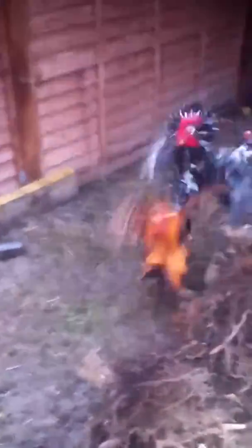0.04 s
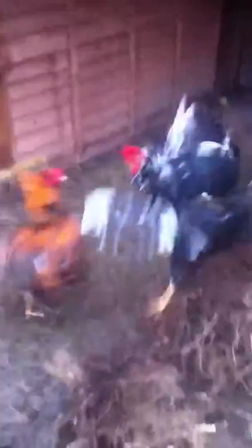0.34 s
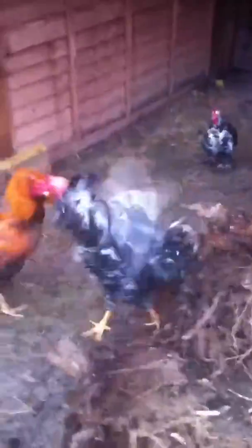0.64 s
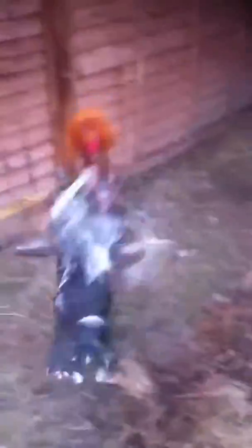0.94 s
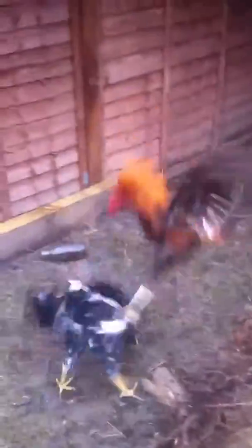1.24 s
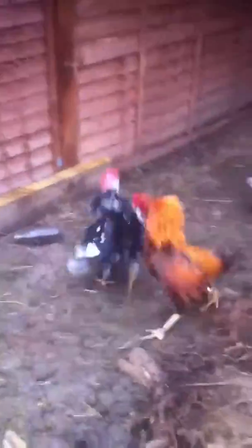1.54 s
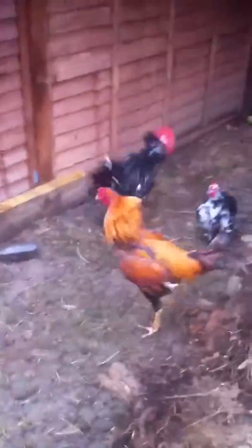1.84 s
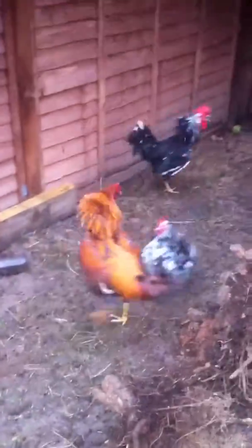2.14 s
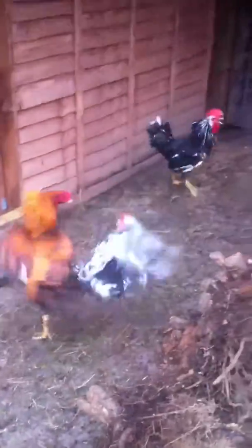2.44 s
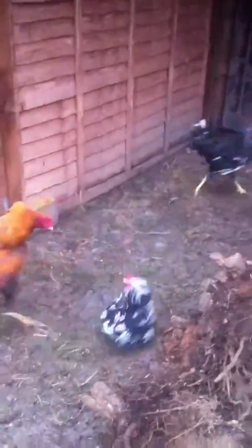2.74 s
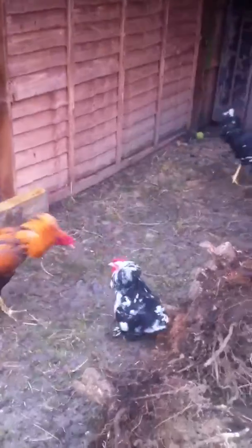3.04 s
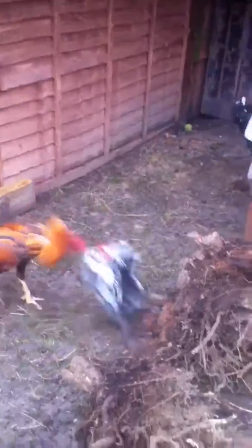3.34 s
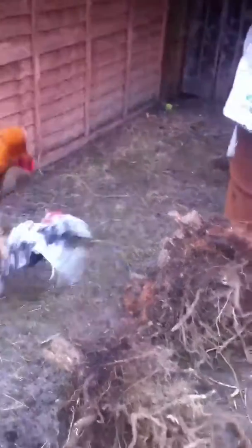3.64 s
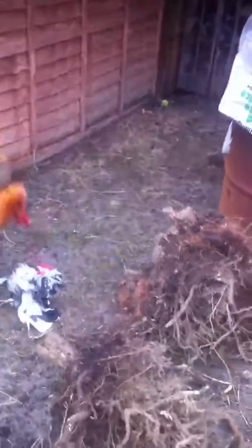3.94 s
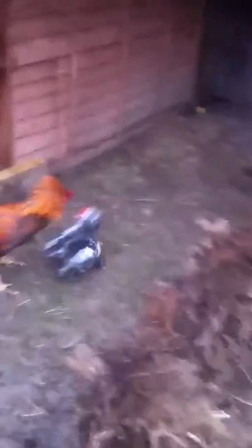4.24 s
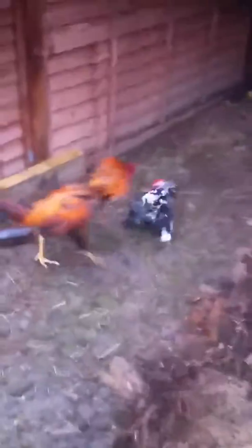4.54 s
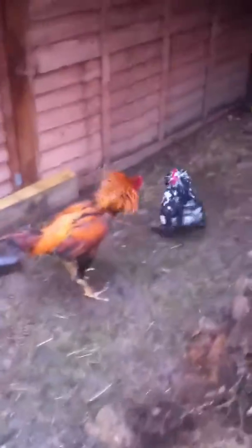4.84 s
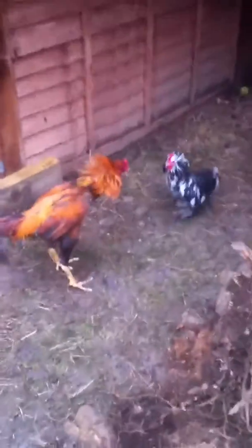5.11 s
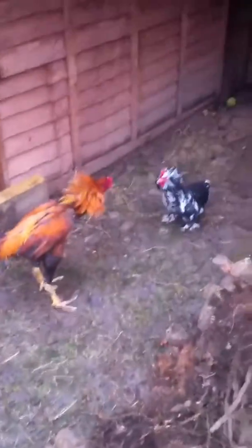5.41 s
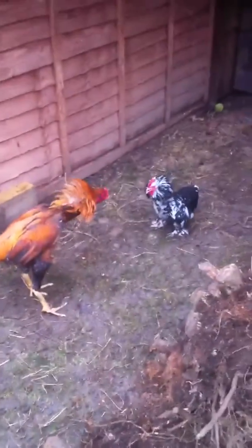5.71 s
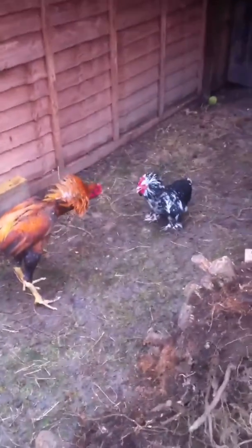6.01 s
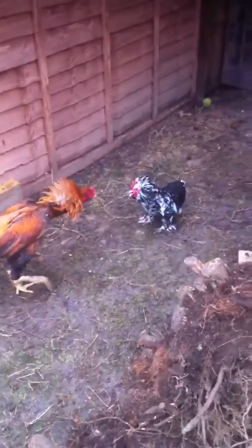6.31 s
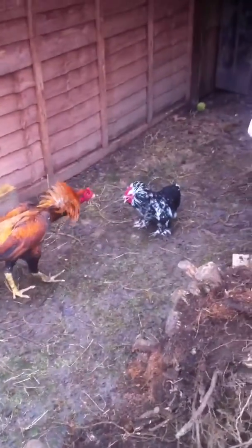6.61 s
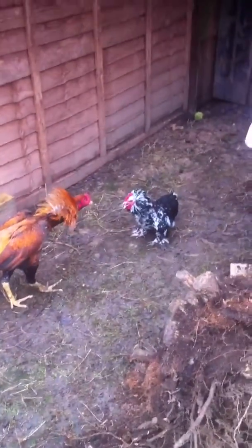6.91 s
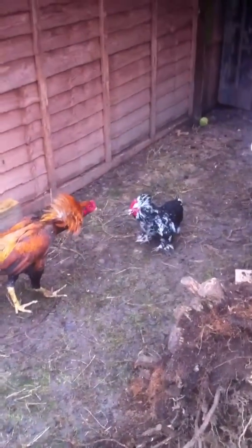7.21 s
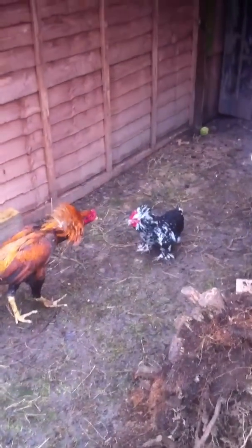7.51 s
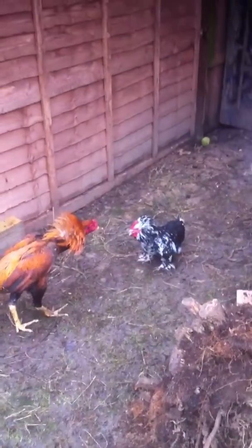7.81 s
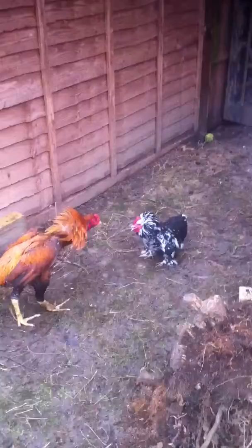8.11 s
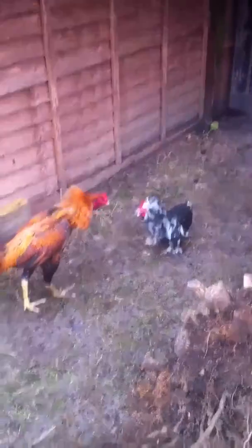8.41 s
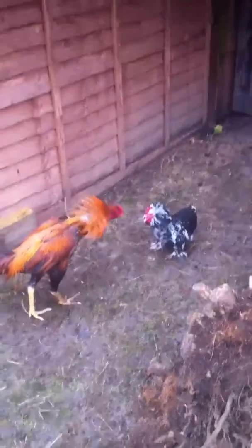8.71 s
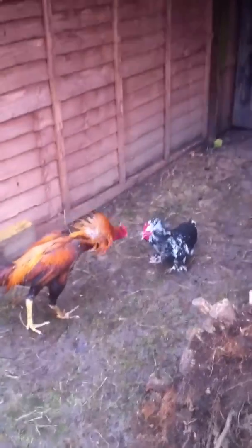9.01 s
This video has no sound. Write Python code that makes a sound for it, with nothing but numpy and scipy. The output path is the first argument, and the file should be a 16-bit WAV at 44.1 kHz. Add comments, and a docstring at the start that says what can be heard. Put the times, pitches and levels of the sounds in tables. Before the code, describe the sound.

Two roosters spar with bursts of clapping wings and rustling feathers, then settle into soft clucks, pips and a thin whine.

```python
"""Two roosters spar on bare earth beside a wooden fence. First come two light wing claps, pops of trapped
air, then clucks and falling pips. After one second the main clash claps and thumps, and a bird leaves on
slowing, whistling wingbeats. Lighter flurries and rustles follow. From five seconds on, in the stand-off,
a wing is shaken, syrinx pulses ring the throat in clucks, and pips rise among soft hums; last, one bird
whines thinly. Throughout, ground, fence and walls reflect the sound over a quiet outdoor rumble."""
import sys
import numpy as np
from scipy import signal
from scipy.fft import rfft, irfft
from scipy.io import wavfile

SR = 44100
rng = np.random.default_rng(int(sys.argv[2]) if len(sys.argv) > 2 else 0)


def dump(signal):
    """Clip the signal to [-1, 1] and save it as 16-bit WAV at the path in sys.argv[1]."""
    limited = np.clip(np.atleast_2d(signal).T, -1, 1)
    pcm = np.round(limited * 32767).astype(np.int16)
    wavfile.write(sys.argv[1], SR, pcm)


N = 403515
TIME = np.arange(N) / SR

# Wings meeting. Each row: start in seconds, pop level in dB, pop pitch in Hz, relative crack gain in dB,
# feather level in dB, feather tilt in dB per octave, level of the displaced air in dB.
WING_CLAPS = [(.105, -49, 870, 9, -39, 1, -47), (.177, -37, 686, 3, -34, -0.5, -48),
              (1.0538, -23, 316, -8.5, -31, -2.5, -27), (1.1602, -19.5, 564, 2.5, -30.5, -.7, -43),
              (1.2392, -25, 1054, 8, -30, -3.5, -48), (1.3289, -31.5, 860, 8.5, -30, -1.5, -36),
              (2.457, -48.5, 873, 0.5, -52, 4, -66), (3.61, -63, 700, 10, -49, -1.5, -51)]
# Soft low thumps: wing downstrokes and one muffled, cluck-like sound (0.314 s).
# Each row: peak time in seconds, thump level in dB, frequency factor, rustle level in dB.
LOW_THUMPS = [(.146, -42.5, 0.94, -41), (.314, -50.5, 1.36, -64), (1.101, -34, 0.96, -33.5),
              (1.48, -55, 0.89, -67), (3.585, -43, 1.37, -51), (3.987, -57, .85, -78)]
# Brushes, scuffs and one soft, breathy cluck (0.609 s).
# Each row: peak time in seconds, level in dB, fall in seconds, tilt in dB per octave.
SOFT_BURSTS = [(.033, -56, 0.016, -3), (0.063, -45, 0.0068, -3.5), (.088, -45, 0.022, -3),
               (.12, -47.5, 0.042, -3), (.184, -36, 0.019, -1.2), (.25, -53, 0.019, -0.5),
               (.301, -49.5, 0.01, -5), (.40, -54, 0.02, -1.5), (.609, -53, 0.014, -7),
               (1.05, -46, 0.09, -2), (1.385, -50, .03, -1), (1.448, -44.5, 0.014, -1),
               (2.465, -55.5, 0.064, -1), (2.50, -49.5, 0.0069, -3), (2.602, -52.5, 0.0068, 0),
               (3.54, -50.5, 0.041, -1.5), (3.735, -55, 0.022, -1.5), (3.926, -58.5, 0.034, 0.5),
               (4.165, -56.5, 0.02, 1), (4.233, -54, 0.032, 0), (4.475, -56, 0.016, 0.5),
               (5.414, -57.5, 0.054, -4.5), (8.284, -62, .006, -3), (8.59, -69, 0.069, 1)]
# Activity of feet and plumage, ending at rest. Each row: time in seconds, bustle in dB before scaling.
BUSTLE = [(0.0, -60.5), (0.59, -66.5), (0.81, -62.5), (1.04, -66), (1.2, -60), (1.3, -59.5), (1.55, -65),
          (1.78, -68), (2.24, -71.5), (2.6, -67), (3.16, -71.5), (3.49, -72.5), (3.69, -66.5),
          (4.43, -68.5), (4.69, -73.5), (9.15, -74.5)]
# Low clucks. Each row: peak time in seconds, level in dB, fall in seconds, pitch in Hz,
# factor on the throat's resonance frequencies, upper band edge in Hz.
LOW_CLUCKS = [(.500, -45, 0.0057, 249, 0.83, 1090), (1.497, -41.5, 0.011, 235, 1.25, 2000),
              (1.743, -47, 0.011, 296, 1.09, 1590), (2.1014, -31.5, .017, 239.6, 0.987, 3650),
              (2.274, -47, .004, 290, 1.04, 890), (5.125, -60, .007, 261, 1.2, 1800),
              (5.348, -50, .005, 293, 1.23, 2200), (6.115, -61, .009, 275, 1.2, 2980),
              (6.256, -49.5, 0.011, 269, 1.05, 755), (6.573, -60.5, .006, 285.5, 1.55, 3000),
              (6.778, -47.5, .016, 306, 1.04, 2300), (6.953, -45, 0.012, 296, 1.14, 2080),
              (7.305, -57, 0.0095, 302, 0.94, 980)]
# High pips. Each row: peak time in seconds, level in dB, pitch in Hz, glide in octaves per second,
# relative level of the octave in dB.
HIGH_PIPS = [(.575, -49, 1074, -11.5, -22), (.717, -43, 1118, -11.5, -20), (.880, -41, 1073, -8, -18.5),
             (2.29, -50.5, 1090, -10, -7), (7.19, -46, 1080, 2.5, -26), (7.445, -43.5, 1084, 1.2, -20.5)]
# Soft hums. Each row: peak time in seconds, level in dB, pitch in Hz, relative level of the octave in dB.
SOFT_HUMS = [(3.23, -65, 830, -18), (6.76, -65, 930, -6), (7.022, -58, 930, -9), (7.165, -70, 1040, -5),
             (7.38, -62.5, 1075, -23)]
# A thin whine, one list per note. Each row: time in seconds, pitch in Hz, level in dB.
WHINE_NOTES = [
    [(8.17, 1270, -86.5), (8.178, 1266, -71), (8.276, 1360, -76), (8.286, 1455, -71), (8.296, 1366, -73),
     (8.498, 1330, -64.5), (8.534, 1278, -60), (8.572, 1279, -70), (8.64, 1320, -67), (8.736, 1310, -90),
     (8.868, 1410, -56.5), (8.915, 1475, -64)],
    [(9.005, 1260, -86), (9.017, 1266, -58.5), (9.055, 1270, -65), (9.075, 1356, -61), (9.119, 1420, -59.5),
     (9.15, 1420, -77)],
]
# Resonances of quills and throat. Each row: nominal frequency in Hz, bandwidth in Hz, gain in dB.
QUILL_MODES = [(1560, 140, 10), (2090, 94, 20.7), (2700, 410, 20.2), (3320, 90, 2.7), (4560, 230, 2.2)]
THROAT_FORMANTS = [(225, 28, -5), (495, 62, 8), (670, 99, 1.5), (987, 78, 7), (1410, 470, -6),
                   (2600, 250, -8), (3760, 660, -18.5)]
# Noise spectra of feather friction, displaced air, whistling flight feathers and the outdoors.
# Each row: nominal frequency in Hz, relative spectral density in dB.
FEATHER_SPECTRUM = [(85, 0), (250, 5.5), (700, 8), (1500, 6.5), (3000, 3.5), (6000, 1.5), (10000, 1),
                    (15500, -0.5)]
THUMP_SPECTRUM = [(40, -28), (112, -64), (158, 12.5), (240, -2), (350, -3.5), (550, 0), (850, -13.5),
                  (1500, -32), (4000, -53)]
SWISH_SPECTRUM = [(200, -14), (700, -16), (1200, -6), (1700, 2.5), (2150, 4.5), (2800, 4.5), (3600, -10),
                  (5200, -5), (6800, -18.5), (15000, -30)]
OUTDOOR_SPECTRUM = [(25, 0.5), (55, -19.5), (95, -11), (145, -0.5), (215, 2.5), (330, -5.5), (550, -6),
                    (1000, -7.5), (1600, -15.5), (2600, -23.5), (3500, -23), (4500, -23), (6000, -25.5),
                    (15500, -27.5)]
# Echoes from ground, fence and house wall. Each row: delay in seconds, gain in dB.
REFLECTIONS = [(.0048, -19), (0.022, -11.5), (.031, -16), (.068, -19.5)]


def claps(pop_build_s=0.0013, crack_s=0.00093, vane_db=-9.0, lag_s=0.003, rise_s=0.0044):
    """Impact: as wings meet, trapped air pops, vanes crack and quills resonate; a brush and gust follow."""
    out, t = np.zeros(N), np.arange(2048) / SR
    for s, level_db, hz, crack_db, feather_db, tilt_db, air_db in WING_CLAPS:
        pop = t / pop_build_s * np.exp(1 - t / pop_build_s) * np.sin(2 * np.pi * hz * t)
        crack = .5 * rng.standard_normal(len(t)) * np.exp(-t / crack_s)
        quills = sum(from_db(db) * resonate(crack, f, width) for f, width, db in QUILL_MODES)
        snap = from_db(crack_db) * (from_db(vane_db) * crack + quills)
        add(out, s, from_db(level_db) * (pop + snap))
        add(out, *brush(s + lag_s, feather_db, rise_s, fall_s=0.013, tilt_db=tilt_db))
        add(out, *gust(THUMP_SPECTRUM, s + lag_s, air_db, rise_s, fall_s=0.018, speed=1))
    return out


def thumps(rise_s=0.016, fall_s=0.015):
    """Displacement of air: downstrokes thump softly and rustle; one muffled thump is more like a cluck."""
    out = np.zeros(N)
    for s, thump_db, speed, rustle_db in LOW_THUMPS:
        add(out, *gust(THUMP_SPECTRUM, s, thump_db, rise_s, fall_s, speed))
        add(out, *brush(s, rustle_db, rise_s, fall_s, tilt_db=-1.3))
    return out


def sweeps(start_s=1.205, count=8, beat_s=0.075, slowing_s=0.0023, run_db=-41, rise_s=0.03):
    """Flow noise: flight feathers whistle in a slowing run of ever higher beats, then in one wing shake."""
    out, s = np.zeros(N), start_s
    for k in range(count):
        level_db = run_db - 6 * (k == 0) - 14.5 * (k == count - 1)   # first and last beats are softer
        add(out, *gust(SWISH_SPECTRUM, s, level_db, rise_s, fall_s=0.02, speed=0.9 + 0.015 * k))
        s += beat_s + slowing_s * (k + .5)
    add(out, *gust(SWISH_SPECTRUM, s=5.42, level_db=-58, rise_s=rise_s, fall_s=0.054, speed=0.9))
    return out


def gust(spectrum, s, level_db, rise_s, fall_s, speed):
    """Turbulence: the noise of stirred air shifts up in frequency with speed. Returns start and sound."""
    t, shape = swell(rise_s, fall_s)
    air = shape * noise([(hz * speed, db) for hz, db in spectrum], size=len(t))
    return s + t[0], from_db(level_db) * air * np.linalg.norm(shape) / np.linalg.norm(air)


def brush(s, level_db, rise_s, fall_s, tilt_db, flutter_db=2.5):
    """Friction noise: dense, uneven ticks, as of barbs slipping over barbs. Returns start and sound."""
    t, shape = swell(rise_s, fall_s)
    ticks = noise(FEATHER_SPECTRUM, size=len(t), grain_db=5.5, tilt_db=tilt_db)
    return s + t[0], shape * ticks * from_db(level_db + flutter_db * drift(388.2, size=len(t)))


def clucks(sag_octaves_per_s=2.0, low_hz=240, unsteady=0.039, breathy=0.039, long_fall_s=0.011):
    """Source and filter: syrinx pulses, sagging in pitch, ring the throat; a closed beak dulls them."""
    out = np.zeros(N)
    for s, level_db, fall_s, hz, throat, edge_hz in LOW_CLUCKS:
        rise_s = 0.0057 * 2 ** ((-40 - level_db) / 11)   # softer clucks start more slowly
        t, shape = swell(rise_s, fall_s)
        jitter = unsteady * drift(300, size=len(t))
        breath = breathy * rng.standard_normal(len(t))
        cycles = np.cumsum(hz * 2 ** (-sag_octaves_per_s * t) * (1 + jitter)) / SR
        cycles -= np.interp(0, t, cycles)   # one pulse falls on the peak
        pulses = np.diff(np.floor(cycles), append=np.floor(cycles[-1]))
        source = (pulses + breath) * shape
        voice = sum((-1) ** k * from_db(db) * resonate(source, f * throat, width)
                    for k, (f, width, db) in enumerate(THROAT_FORMANTS))
        voice = signal.sosfilt(signal.butter(3, [low_hz, edge_hz], "band", fs=SR, output="sos"), voice)
        add(out, s + t[0], from_db(level_db) * voice * np.linalg.norm(shape) / np.linalg.norm(voice))
        rasp_db = -57.5 + 0.4 * (level_db + 50)   # hoarse air grows more slowly than the voice
        rasp = shape * noise(FEATHER_SPECTRUM, size=len(t), tilt_db=-6.5)
        add(out, s + t[0], from_db(rasp_db) * rasp)
        if fall_s > long_fall_s:   # a long cluck breaks into a clear, higher note
            break_s = s + 1.7 * fall_s
            add(out, *note(break_s, level_db - 9.5, fall_s, fall_s, 3.04 * hz, glide=-2.18, octave_db=-27))
    return out


def pips_and_hums(pip_fall_s=0.0083, hum_width_s=0.021):
    """Frequency glide: pips fall in the fight and rise in the stand-off; soft hums rise gently."""
    out = np.zeros(N)
    for s, level_db, hz, glide, octave_db in HIGH_PIPS:
        rise_s = 0.016 + 0.00042 * glide   # falling pips start more abruptly
        add(out, *note(s, level_db, rise_s, pip_fall_s, hz, glide, octave_db))
    for s, level_db, hz, octave_db in SOFT_HUMS:
        add(out, *note(s, level_db, hum_width_s, hum_width_s, hz, glide=1.094, octave_db=octave_db))
    return out


def note(s, level_db, rise_s, fall_s, hz, glide, octave_db, waver=0.017, tremble_db=2.7, lead_s=0.0017):
    """Harmonic vibration: an unsteady gliding tone whose octave swells first. Returns start and sound."""
    t, _ = swell(rise_s, fall_s)
    shape, early = (np.exp(-(u / np.where(u < 0, rise_s, fall_s)) ** 2) for u in (t, t + lead_s))
    pitch_hz = hz * 2 ** (glide * t) * (1 + waver * drift(284.0, size=len(t)))
    phase = 2 * np.pi * np.cumsum(pitch_hz) / SR
    tone = np.sqrt(2) * (shape * np.sin(phase) + from_db(octave_db) * early * np.sin(2 * phase))
    return s + t[0], from_db(level_db + tremble_db * drift(203, size=len(t))) * tone


def whine(waver=0.0085, tremble_db=3.2, hoarse=0.036):
    """Random frequency modulation: a drawn-out warning tone turns hoarse as effort raises its jitter."""
    effort = sum(np.interp(TIME, s, from_db(level_db), left=0, right=0)
                 for s, _, level_db in map(np.transpose, WHINE_NOTES))
    s, hz, _ = np.vstack(WHINE_NOTES).T
    jitter = waver * drift(150) + hoarse * np.sqrt(effort / effort.max()) * drift(900)
    phase = 2 * np.pi * np.cumsum(np.interp(TIME, s, hz) * (1 + jitter)) / SR
    return np.sqrt(2) * np.sin(phase) * effort * from_db(tremble_db * drift(250))


def soft_bursts(rise_share=0.47):
    """Transient noise: brushes, scuffs and one soft, breathy cluck; longer ones build up more slowly."""
    out = np.zeros(N)
    for s, level_db, fall_s, tilt_db in SOFT_BURSTS:
        add(out, *brush(s, level_db, rise_share * fall_s, fall_s, tilt_db))
    return out


def scuffle(rest_db=-76, bustle_scale=1.31, patchy_db=2.5):
    """Superposition: small contacts of shifting feet and feathers merge into a soft, gritty bed."""
    s, bustle_db = np.transpose(BUSTLE)
    above_rest_db = bustle_scale * (np.interp(TIME, s, bustle_db) - bustle_db[-1])
    gain = from_db(rest_db + above_rest_db + patchy_db * drift(40))
    return gain * noise(FEATHER_SPECTRUM, grain_db=4.0, tilt_db=-0.6)


def yard_echoes(x, wall_cut_hz=4500, tail_db=-17.0, tail_t60_s=0.68, build_s=0.054):
    """Reflection: a few dull echoes and a short diffuse scatter between fence and walls."""
    t = np.arange(SR // 2) / SR
    scatter = rng.standard_normal(len(t)) * from_db(-60 * t / tail_t60_s) * np.minimum(t / build_s, 1)
    response = from_db(tail_db) * scatter / np.linalg.norm(scatter)
    for delay_s, level_db in REFLECTIONS:
        add(response, delay_s, from_db([level_db]))
    response = signal.sosfilt(signal.butter(1, wall_cut_hz, fs=SR, output="sos"), response)
    return signal.fftconvolve(x, response)[:N]


def background(outdoor_db=-62, hum_hz=210, hum_width_hz=60, hum_db=-73):
    """Stationary noise: far outdoor rumble and even hiss, with a narrow low band heard as a hum."""
    band = resonate(rng.standard_normal(N), hum_hz, hum_width_hz)
    hum = unit_rms(resonate(band, hum_hz, hum_width_hz))
    return from_db(outdoor_db) * noise(OUTDOOR_SPECTRUM) + from_db(hum_db) * hum


def noise(spectrum, size=N, grain_db=0., tilt_db=0.):
    """Spectral shaping: coloured noise, tilted per octave above 500 Hz; uneven samples make it crackle."""
    white = rng.standard_normal(size) * from_db(grain_db * np.minimum(rng.exponential(1, size), 4))
    octaves = np.log2(np.maximum(np.fft.rfftfreq(size, 1 / SR), 10))
    hz, level_db = np.transpose(spectrum)
    colour_db = np.interp(octaves, np.log2(hz), level_db) + tilt_db * np.maximum(octaves, np.log2(500))
    return unit_rms(irfft(rfft(white) * from_db(colour_db), size))


def resonate(x, hz, width_hz):
    """Damped resonance with unit gain at its peak."""
    r = np.exp(-np.pi * width_hz / SR)
    feedback = [1, -2 * r * np.cos(2 * np.pi * hz / SR), r * r]
    return signal.lfilter(np.array([1, 0, -1]) * (1 - r * r) / 2, feedback, x + 1e-18)


def swell(rise_s, fall_s):
    """Gaussian rise and exponential decay. Returns time around the peak and the envelope."""
    t = np.arange(-4096, 12288) / SR
    return t, np.exp(-np.where(t < 0, (t / rise_s) ** 2, t / fall_s))


def drift(rate_hz, size=N):
    """Random fluctuation, interpolated between values of unit spread."""
    knots = rng.standard_normal(size // 20 + 2)
    return np.interp(np.arange(size) * rate_hz / SR, np.arange(len(knots)), knots)


def from_db(db):
    """Decibels as an amplitude ratio."""
    return 10 ** (np.asarray(db) / 20)


def unit_rms(x):
    """Normalisation to unit power."""
    return x / np.sqrt(np.mean(x ** 2) + 1e-20)


def add(out, s, sound):
    """Superposition of a sound from s seconds on."""
    at = round(s * SR) + np.arange(len(sound))
    inside = (at >= 0) & (at < N)
    out[at[inside]] += sound[inside]


def scene(wing_echo_db=-1.5, call_echo_db=-4.0):
    """Superposition of direct sound from wings and calls, its reflections and the background."""
    wings = claps() + thumps() + sweeps() + soft_bursts() + scuffle()
    calls = clucks() + pips_and_hums() + whine()
    echoes = yard_echoes(from_db(wing_echo_db) * wings + from_db(call_echo_db) * calls)
    return (wings + calls + echoes + background())[None]


def record(dry, bass_cut_hz=95, top_cut_hz=15750):
    """Band limiting: a small microphone loses the bass, and the top is cut steeply."""
    thin = signal.sosfilt(signal.butter(2, bass_cut_hz, "high", fs=SR, output="sos"), dry)
    return signal.sosfilt(signal.ellip(10, .1, 70, top_cut_hz, fs=SR, output="sos"), thin)


dry = scene()
out = record(dry)
dump(out)
```